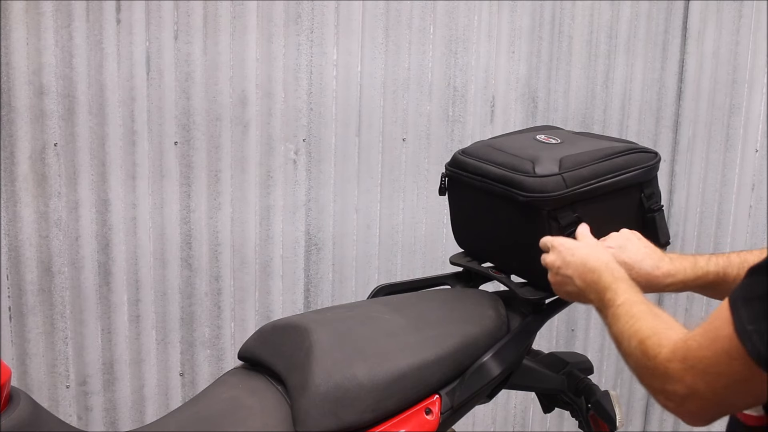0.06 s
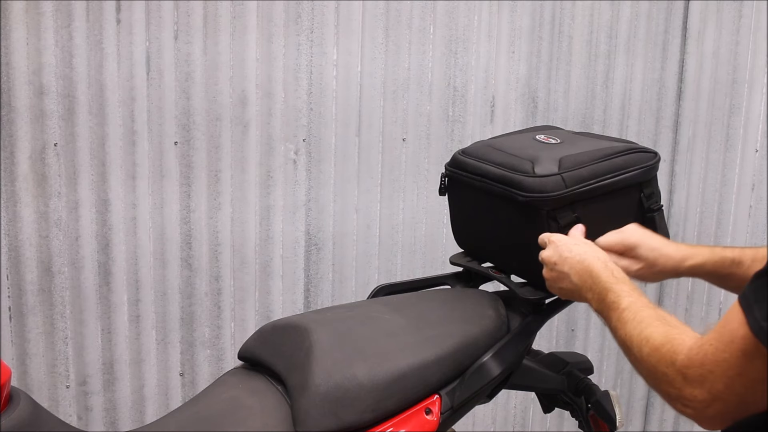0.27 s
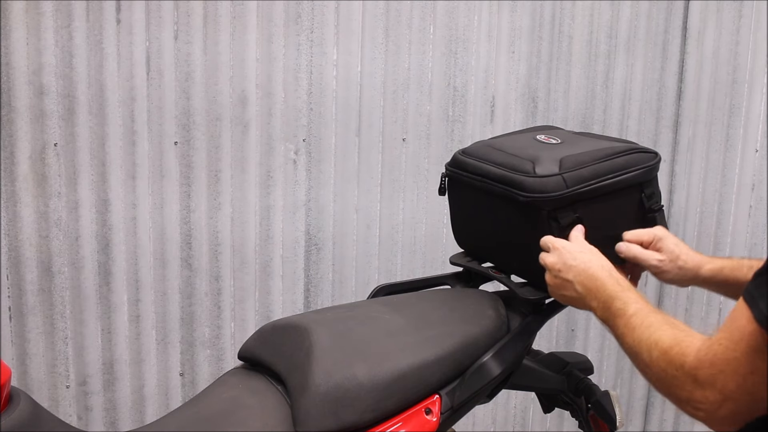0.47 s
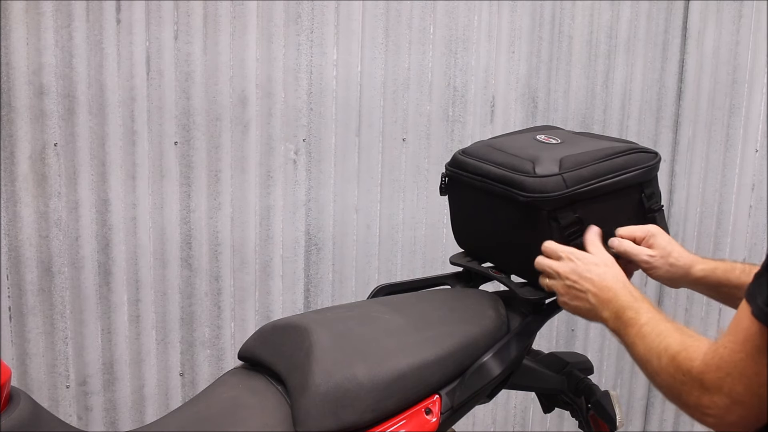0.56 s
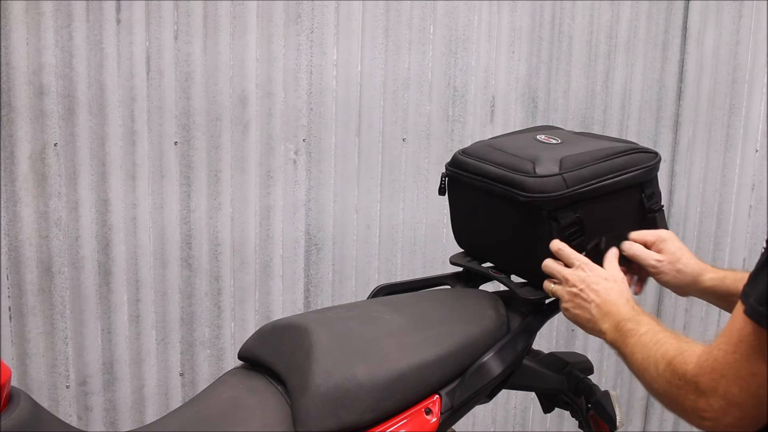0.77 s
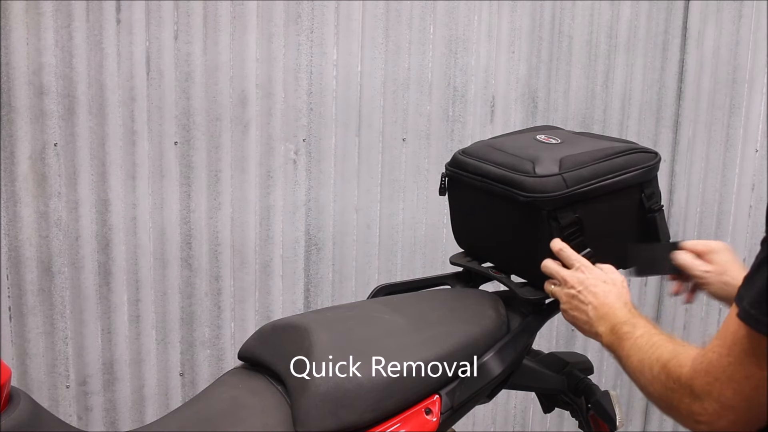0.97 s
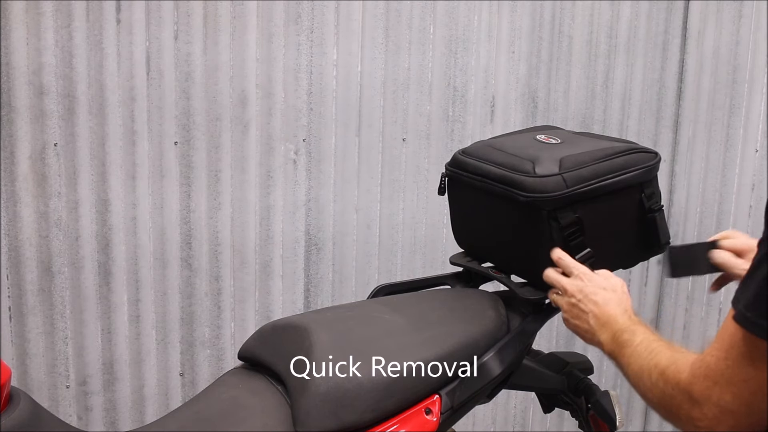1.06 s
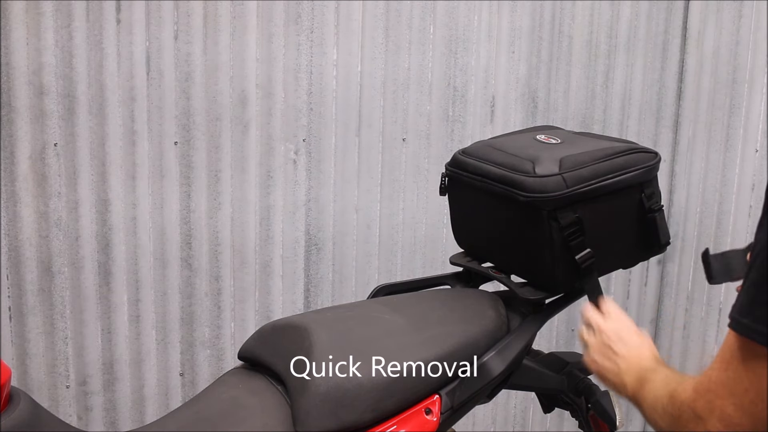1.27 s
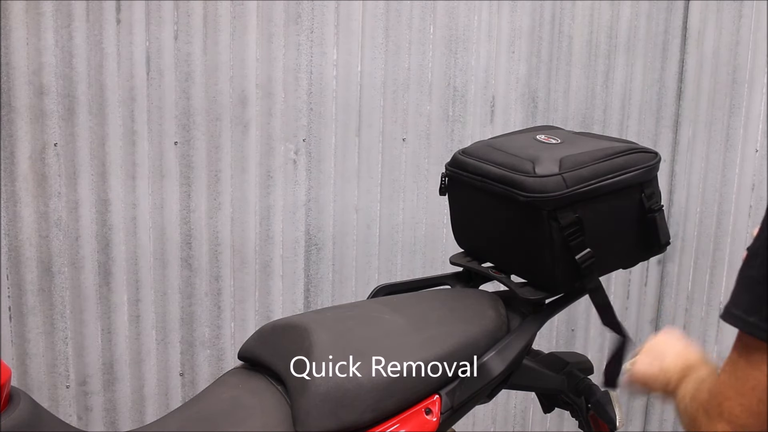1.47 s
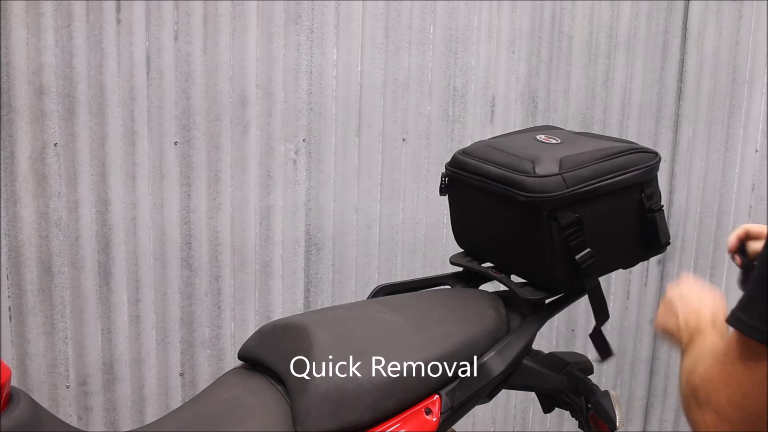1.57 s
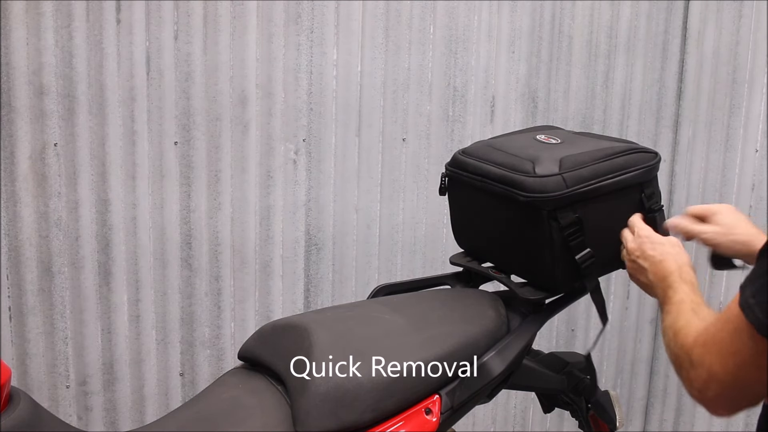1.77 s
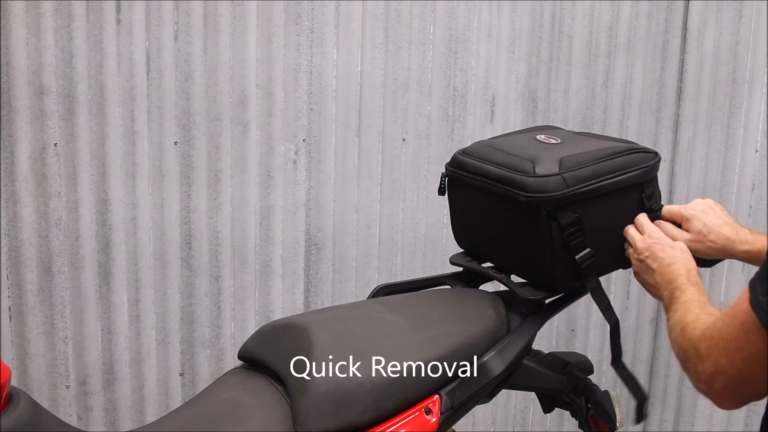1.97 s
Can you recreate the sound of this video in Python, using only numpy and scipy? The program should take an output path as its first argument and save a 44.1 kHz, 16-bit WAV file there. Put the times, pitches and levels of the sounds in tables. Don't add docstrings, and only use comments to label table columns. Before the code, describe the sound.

A plastic buckle on a fabric bag is fumbled with quick clicks from the start, growing into sharp, dense snaps around 0.2-0.4 s. A near-quiet gap follows. At about 0.86 s the bag gives a hollow thump, with strap rasps and clicks until 1.05 s. Soft bag taps come near 1.4 s, then light bright strap ticks to 1.8 s and faint final pats. Close, short shed reverberation, low steady hiss.

```python
import sys
import numpy as np
from scipy import signal
from scipy.fft import rfft, irfft
from scipy.io import wavfile

SR = 44100
rng = np.random.default_rng(int(sys.argv[2]) if len(sys.argv) > 2 else 0)


def unload_wav(signal):
    wavfile.write(
        sys.argv[1],
        SR,
        np.round(np.clip(np.atleast_2d(signal).T, -1, 1) * 32767).astype(np.int16),
    )


def volts_from_db(level):
    exponent = np.asarray(level, float) / 20
    return 10 ** exponent


N = 88200

# [t/s, peak level/dB, brightness/(dB/octave), knock passed to the bag/dB]
BUCKLE_TICKS = [(0.0115, -48, 39.5, -30), (0.0377, -38.5, -17, 1), (0.076, -36.5, 11, -27),
                (0.0866, -33.5, 17.5, -27), (0.1165, -17.5, 4.5, -1.5), (0.1684, -14.5, 8, -4.5),
                (0.1926, -17.5, 0.5, 1.5), (.2072, -15, -3, 5), (0.211, -6.5, -1, -12.5),
                (.233, -39, 0, 11), (0.24, -26.5, -10, 0), (.268, -18, -7, -2), (0.2753, -14, -10.5, -26),
                (0.278, -11.5, -5, -5.5), (0.301, -35.5, 17.5, -11), (0.3325, -16, -4.5, -25),
                (0.3376, -7.5, 14, -34), (.3565, -15.5, -4.5, 4), (0.3758, -18.5, 27.5, 18.5),
                (0.3824, -3.5, -6, -47), (0.3876, -22.5, 2, -36), (.4795, -42, 0, 21.5),
                (.639, -38.5, 0, 6), (.942, -29, -18, -4)]
# [start t/s, length/s, level/dB, brightness/(dB/octave), share of the length spent rising]
WEBBING_RASPS = [(-.01, 0.068, -50.5, -0.5, 0.16), (.118, 0.037, -48.5, 4.5, 0.087),
                 (.172, 0.032, -45, 3.5, 0.035), (.2, 0.05, -37.5, 0.5, 0.15),
                 (.277, 0.058, -45.5, -1.5, 0.033), (.3235, 0.019, -23, -4, 0.37),
                 (.343, 0.012, -25.5, 1, 0.18), (.354, 0.015, -34.5, 3, 0.17),
                 (.3665, 0.023, -19, 3.5, 0.43), (.385, 0.046, -35, 2.5, 0.13), (.42, 0.19, -48.5, 2, 0.24),
                 (.62, 0.072, -60.5, -8.5, 0.14), (.853, 0.029, -36, -3.5, 0.24),
                 (.875, 0.1, -44, -2.5, 0.14), (.93, 0.079, -42.5, -0.5, 0.22),
                 (.98, 0.012, -36, -2.5, 0.4), (1.002, 0.024, -32, -2.5, 0.53),
                 (1.025, 0.018, -30, -1, 0.61), (1.042, 0.022, -40, 2.5, 0.12), (.84, 0.023, -50, -7, 0.93),
                 (1.78, 0.028, -38, 2, 0.27)]
# [f/Hz, width/Hz, level/dB]
BUCKLE_MODES = [(1312, 1300, 2), (1700, 1100, -3), (2250, 950, -3.5), (3112, 1000, -3), (3790, 1470, -2.5),
                (4544, 1700, -5.5), (6260, 1770, -6), (7325, 730, -9), (8540, 2200, -7.5),
                (11460, 5200, -9.5), (14450, 2100, -2)]
# [t/s, peak level/dB, f/Hz, swell time/ms]
CONTACT_RINGS = [(.2062, -30.5, 2240, 2.2), (0.2038, -34, 3660, 1.3), (.219, -36, 692, 7),
                 (0.2779, -20.5, 1880, 0.98), (.2995, -36, 1950, 1.3), (.3265, -23, 4100, 1.5),
                 (0.3303, -13.5, 2020, 2), (.333, -17, 4120, 1), (.3345, -19, 2290, 2.8),
                 (.337, -13.5, 1236, 1.34), (.345, -21, 1340, 1.33), (.3478, -16, 2250, 1.42),
                 (.356, -22, 3550, 1), (.359, -21.5, 1700, 1), (.3595, -25, 4260, 1.1),
                 (.3695, -19, 2300, 1.1), (.3755, -11.5, 2040, 1), (.379, -15.5, 4610, 2),
                 (.381, -17, 1443, 2), (.3855, -17.5, 1290, 1.8), (.3862, -17, 3560, 1),
                 (.8555, -28, 654, 5.63), (.857, -24.5, 1205, 2.2), (.8635, -31, 655, 8.1),
                 (.864, -29, 1140, 2.9), (1.04, -34.5, 636, 6.3), (.941, -30.5, 1254, 2.06),
                 (.948, -32, 970, 2.15), (1.0125, -25.5, 1560, 1.47), (1.034, -26, 3670, 1.2),
                 (1.0355, -27, 1936, 1.8), (1.035, -27.5, 259, 4.3), (1.039, -23, 4170, 1.03),
                 (1.058, -36.5, 230, 5.65), (1.366, -49.5, 397, 7), (1.378, -44.5, 625, 8),
                 (1.391, -42, 640, 14), (1.392, -38, 409.4, 11.3), (1.424, -47, 586, 6),
                 (1.438, -48, 956, 9.9), (1.44, -45.5, 482, 9.9), (1.7195, -54, 4230, 1.5),
                 (1.7639, -28, 4440, 1.2), (1.782, -26.5, 4030, 0.88), (1.792, -33, 3100, 1.56),
                 (.212, -49.5, 229, 10), (1.858, -43, 359, 6.9), (1.858, -42.5, 176, 7.3),
                 (1.885, -43.5, 190, 9), (1.8855, -42, 690, 2.3)]
# [t/s, peak level/dB, brightness/(dB/octave)]
STRAP_TICKS = [(1.464, -35, -5), (1.4755, -27, 15.5), (1.556, -31, 4), (1.5632, -34.5, 16),
               (1.5753, -35, -17), (1.636, -21, -1), (1.6384, -39, -13), (1.69, -32.5, 15.5),
               (1.7625, -50, -23), (1.7655, -48, 4.5), (1.775, -19.5, 7.5), (1.7825, -32, 10),
               (1.7884, -29, 11.5), (1.795, -40, -2)]
# [start t/s, length/s, level/dB, brightness/(dB/octave), share spent rising]
STRAP_SLIDES = [
    (1.13, 0.052, -56, -10, .4),
    (1.552, 0.016, -63, 8, 0.33),
    (1.395, 0.075, -49, -5.5, 0.26),
    (1.47, 0.02, -53, 9, 0.14),
    (1.548, 0.073, -53.5, 4, 0.35),
    (1.59, 0.056, -50.5, -3, 0.95),
    (1.665, 0.14, -50.5, -2.5, 0.17),
    (1.757, 0.019, -45, -1, 0.41),
    (1.77, 0.018, -33.5, 0.5, 0.61),
]
# [f/Hz, width/Hz, level/dB]
STRAP_MODES = [(2490, 1800, -7.5), (3700, 1100, -1.5), (4260, 590, 0), (4720, 1400, -2.5),
               (6750, 600, -3.5), (7450, 580, -5), (8400, 2900, -15.5), (14500, 1700, 2)]
# [start t/s, length/s, level/dB, place/octaves from 500 Hz, share spent rising]
CLOTH_PUSHES = [(-.01, 0.038, -55, 0.029, 0.15), (.2, 0.046, -46, 0.58, 0.1), (.328, 0.022, -25, 1.2, 0.17),
                (.372, 0.02, -27.5, 1.66, 1), (.38, 0.0267, -34.5, -0.71, 0.083),
                (.41, 0.14, -57, -0.34, 0.34), (.77, 0.094, -55, 0.52, 1), (.86, 0.018, -35.5, 0.055, 0.12),
                (.865, 0.066, -45, -0.52, 0.19), (.88, 0.062, -42.5, 1.18, 0.54),
                (.93, 0.065, -32, 1.89, 0.14), (.9, 0.085, -45, -0.062, 0.96),
                (1.005, 0.062, -39, 0.93, 0.1), (1.028, 0.029, -38, -0.73, 0.25),
                (1.362, 0.055, -47.5, -0.58, 0.71), (1.42, 0.068, -46.5, 1.67, 0.16),
                (1.853, 0.054, -46.5, -0.97, 0.041), (1.882, 0.043, -58, -0.28, 0.054),
                (1.7, 0.096, -43, 2.45, 0.31)]
# [t/s, peak level/dB, place struck/octaves from 500 Hz]
BAG_SLAPS = [
    (.856, -14, 0.47),
    (1.368, -40, 0.021),
    (1.395, -26, -0.15),
    (1.398, -47, 0.28),
    (1.8538, -33.5, 0.42),
    (1.8965, -28.5, -0.072),
]
# [f/Hz, width/Hz, level/dB]
BAG_MODES = [(179, 43, 0), (241, 72, -1), (343, 84, -5), (399, 88, 0), (483, 25, -9), (646.3, 69, 2),
             (916, 170, -6.5), (1096, 57, -5), (1330, 180, -12.5)]
# [f/Hz, level/(dB per Hz)]
HISS_SPECTRUM = [(12, -42), (20, -2), (120, -4), (163, -5), (606, -8.5), (976, -10.5), (1220, -10.5),
                 (2820, -11.5), (16000, -14)]
# [f/Hz, likeness from 0 to 1]
HISS_LIKENESS = [(40, 0.64), (550, 0.77), (1650, 0.34), (5000, 0.11), (15000, 0.018)]

TICK_GAIN_DB, TICK_SCATTER_DB, CONTACT_S = 5.5, 1.5, 0.0007
TAP_TOP_LOSS_DB = 12
TOP_FADE = 0.17
RASP_SLIPS_PER_S, RASP_SPREAD_DB, RASP_SMOOTH = 3600, 0.95, 0.76
RING_LEAD, RING_ROUNDNESS = 0.595, 2.6
KNOCK_GAIN_DB, SLAP_GAIN_DB = 7.5, 10.5
PUSH_SLIPS_PER_S, PUSH_SPREAD_DB, PUSH_SMOOTH, PUSH_FOCUS_DB = 500, 2.3, 0.75, 10.5
SHED_T60_S, SHED_TREBLE_T60_S, SHED_DB = 0.15, 0.07, -15.5
WALL_CUT_HZ = 11025
HISS_DB = -56.5
TOP_HZ = 16000


def buckle():
    s, db, tilt, _ = np.transpose(BUCKLE_TICKS)
    ticks = struck(s, BUCKLE_MODES, db + TICK_GAIN_DB, tilt, tapped)
    slips = grains(RASP_SLIPS_PER_S, RASP_SPREAD_DB)
    return ticks + rubbed(WEBBING_RASPS, BUCKLE_MODES, slips, RASP_SMOOTH, tilted)


def struck(s, body, level_db, place, colour, count=2):
    at = (s * SR).astype(int)
    t = np.arange(200) / SR
    luck = rng.standard_normal((len(at), len(body)))
    out = 0
    for k, (hz, width, db) in enumerate(body):
        top_loss = (hz > SR / 4) * TAP_TOP_LOSS_DB
        scatter = TICK_SCATTER_DB * luck[:, k]
        clicks = np.zeros(N)
        clicks[at] = volts_from_db(level_db + db + colour(place, hz) - top_loss + scatter)
        contact = np.exp(-t / CONTACT_S) * np.cos(2 * np.pi * hz * t)
        drive = np.convolve(clicks, contact)[:N]
        ringing = resonate(drive, hz, width, count) * np.sqrt(width / SR) / 4
        out = out + (-1) ** k * ringing
    return out


def rubbed(rows, body, slips, smooth, colour, count=2):
    power = strokes(rows) ** 2
    table = np.array(rows)
    level_db, place = table[:, 2], table[:, 3]
    out = 0
    for k, (hz, width, db) in enumerate(body):
        top_fade = (hz > SR / 5) * TOP_FADE * (level_db + 32)
        gain = volts_from_db(level_db + db + colour(place, hz) + top_fade)
        friction = slips + smooth * rng.standard_normal(N)
        drive = np.sqrt(gain ** 2 @ power) * friction
        out = out + (-1) ** k * resonate(drive, hz, width, count) / 2
    return out


def strokes(rows):
    start, length, rise = np.array(rows)[:, [0, 1, 4]].T[:, :, None]
    x = (np.arange(N) / SR - start) / length
    rise = np.clip(rise, 0.03, 1.1)
    ramps = np.minimum(x / rise, (1.3 - x) / (1.3 - rise))
    return np.clip(ramps, 0, 1) ** 1.4


def grains(per_s, spread_db):
    excess = np.minimum(rng.exponential(1, N), 3)
    sizes = volts_from_db(spread_db * excess) * rng.choice([-1, 1], N)
    return rms_one(sizes * (rng.random(N) < per_s / SR))


def resonate(x, hz, width_hz, count):
    r = np.exp(-np.pi * min(width_hz, hz / 3.5) / SR)
    w = 2 * np.pi * hz / SR
    sos = [(1 - r * r) / 2, 0, (r * r - 1) / 2, 1, -2 * r * np.cos(w), r * r]
    return signal.sosfilt([sos] * count, x + 1e-18) * np.sqrt(SR / width_hz)


def tilted(brightness, hz):
    octaves = np.log2(hz / 3500)
    return brightness * np.minimum(octaves, 1.2) - 2.03 * octaves ** 2


def tapped(brightness, hz):
    return tilted(brightness, hz) - 10.0 * np.log2(hz / 3500) ** 2


def rings():
    out = np.zeros(N + SR)
    t = np.arange(SR // 10) / SR
    for s, db, hz, swell_ms in CONTACT_RINGS:
        swell = swell_ms / 1000
        at = int((s - RING_LEAD * swell) * SR)
        envelope = (t / swell * np.exp(1 - t / swell)) ** RING_ROUNDNESS
        out[at:at + len(t)] += volts_from_db(db) * envelope * np.sin(2 * np.pi * hz * t)
    return signal.sosfilt(signal.butter(2, 130, "high", fs=SR, output="sos"), out[:N])


def strap_end():
    s, db, tilt = np.transpose(STRAP_TICKS)
    ticks = struck(s, STRAP_MODES, db, tilt, tilted)
    return ticks + rubbed(STRAP_SLIDES, STRAP_MODES, grains(2800, 1.7), 0.33, tilted)


def bag():
    s, db, _, knock_db = np.transpose(BUCKLE_TICKS)
    knocks = struck(s, BAG_MODES, db + knock_db + KNOCK_GAIN_DB, 0.87, placed, count=1)
    s, db, place = np.transpose(BAG_SLAPS)
    slaps = struck(s, BAG_MODES, db + SLAP_GAIN_DB, place, placed, count=1)
    slips = grains(PUSH_SLIPS_PER_S, PUSH_SPREAD_DB)
    pushes = rubbed(CLOTH_PUSHES, BAG_MODES, slips, PUSH_SMOOTH, placed, count=1)
    cloth = signal.butter(2, [120, 1600], "band", fs=SR, output="sos")
    return signal.sosfilt(cloth, knocks + slaps + pushes)


def placed(place, hz):
    return -PUSH_FOCUS_DB * (np.log2(hz / 500) - place) ** 2


def shed(x):
    t = np.arange(SR) / SR
    build_up = np.clip(t / 0.0096, 0, 1)
    noise = rng.standard_normal(SR) * volts_from_db(-60 * t / SHED_T60_S) * build_up
    dull = signal.sosfilt(signal.butter(2, WALL_CUT_HZ, fs=SR, output="sos"), noise)
    tail = dull + (noise - dull) * volts_from_db(-60 * t / SHED_TREBLE_T60_S)
    return volts_from_db(SHED_DB) * signal.fftconvolve(x, tail / np.sqrt(np.sum(tail ** 2)))[:N]


def hiss():
    hz = np.maximum(np.fft.rfftfreq(N, 1 / SR), 10)
    alike = np.clip(at_hz(HISS_LIKENESS, hz), 0, 1)
    mid, side = rfft(rng.standard_normal((2, N))) * volts_from_db(at_hz(HISS_SPECTRUM, hz))
    both = np.sqrt(1 + alike) * mid + np.sqrt(1 - alike) * side * [[1], [-1]]
    return volts_from_db(HISS_DB) * rms_one(irfft(both, N))


def at_hz(points, hz):
    table_hz, value = np.transpose(points)
    return np.interp(np.log(hz), np.log(table_hz), value)


def rms_one(x):
    return x / np.sqrt(np.mean(x ** 2) + 1e-20)


def scene():
    near = buckle() + rings() + strap_end() + bag()
    return near + shed(near) + hiss()


def roll_off(x):
    return signal.sosfilt(signal.butter(12, 16140, fs=SR, output="sos"), x)


def record(dry):
    passed = np.fft.rfftfreq(N, 1 / SR) < TOP_HZ
    mix = irfft(rfft(dry) * passed, N)
    return roll_off(mix)


dry = scene()
out = record(dry)
unload_wav(out)
```